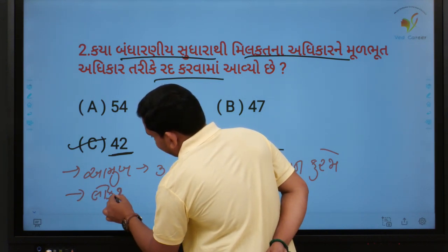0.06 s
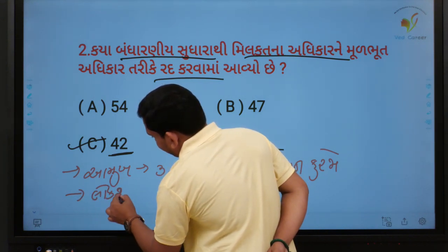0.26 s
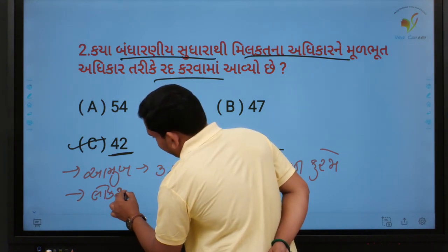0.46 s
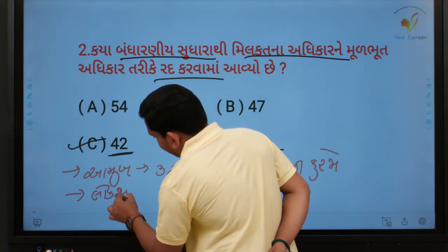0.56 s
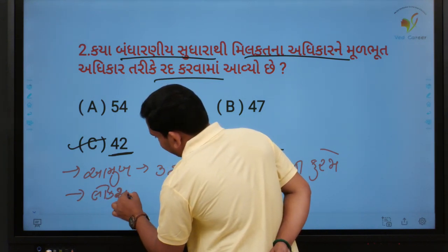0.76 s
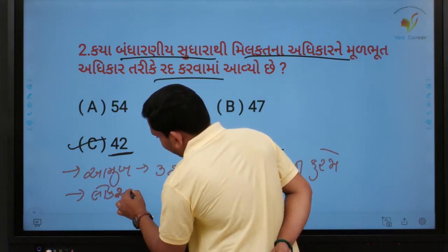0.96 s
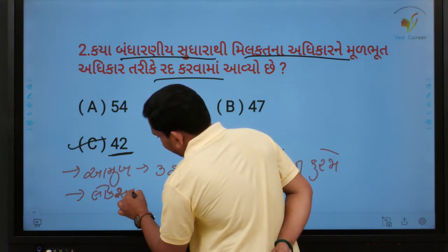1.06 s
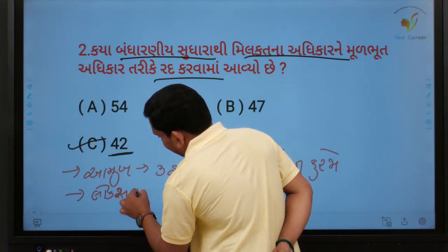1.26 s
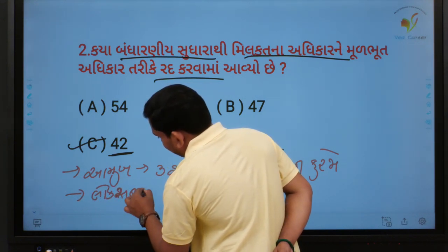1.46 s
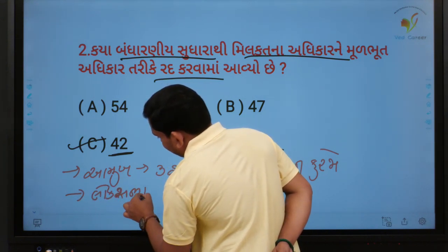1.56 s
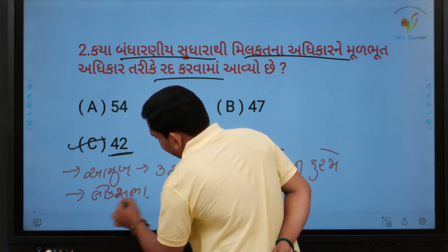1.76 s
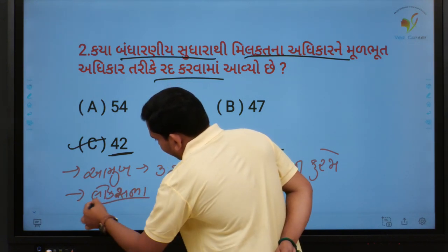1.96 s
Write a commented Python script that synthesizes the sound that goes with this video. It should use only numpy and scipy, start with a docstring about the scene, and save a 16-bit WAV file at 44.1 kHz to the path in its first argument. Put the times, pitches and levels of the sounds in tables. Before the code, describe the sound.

Short, uneven knocks of a plastic pen writing on a large glass screen.

```python
"""Classroom: a plastic stylus writes on a large glass display.
Each touch knocks the panel, which rings briefly and booms. Between knocks the tip slides with a fine
friction hiss, judders in stick-slip and ticks as it lifts. The room answers every knock over a low
rumble, and a faint hum swells midway. A faint background hiss, like a sleeve rustling, dips early
and grows toward the end."""
import sys
import numpy as np
from scipy import signal
from scipy.fft import rfft, irfft, next_fast_len
from scipy.io import wavfile
from scipy.ndimage import uniform_filter1d

SR = 44100
rng = np.random.default_rng(int(sys.argv[2]) if len(sys.argv) > 2 else 0)


def put_to_file(sound):
    """Save the sound as 16-bit audio at rate SR, in the file named by the first command-line argument."""
    columns = np.atleast_2d(sound).T  # one column per channel
    safe = np.clip(columns, -1, 1)
    whole_steps = np.round(safe * 32767)
    wavfile.write(sys.argv[1], SR, whole_steps.astype(np.int16))


N = 88861


def knock(pitch_hz, upper_db, hard_hz, click_db):
    """One touch: the tip snaps and pushes the glass, the panel rings, its small modes rattle."""
    # higher glass modes: freq_hz, level_db, t60_s
    glass_modes = [(1134, -12.5, 0.019), (1352, -15.5, 0.039), (1518, -14.5, .04), (1809, -21, 0.025),
                   (1890, -20, 0.017), (2156, -23, 0.012), (2900, -29, 0.022), (3790, -29, 0.031),
                   (4570, -38, 0.028), (5000, -28.5, 0.035), (8800, -29.5, 0.044)]
    # spectrum of the dense small modes: freq_hz, level_db
    rattle_spectrum = [(150, -49), (400, 12.5), (1000, 1.5), (1800, 0.5), (2700, -15.5), (3800, -6),
                       (5200, -6), (6600, -22.5), (8500, -15), (16000, -19)]
    push_s, hold_s, snap_s = 0.00011, 0.0082, 0.00036
    panel_t60_s, rattle_t60_s, click_t60_s = 0.082, 0.046, 0.035
    radiate_hz = 454  # the panel radiates little below this
    t = np.arange(SR // 6) / SR
    push = amp(-2.5) * t / push_s * np.exp(1 - t / push_s)
    # strong for a few cycles, until the wave has spread to the frame
    hold = np.exp(-(t / hold_s) ** 6) + amp(-22)
    panel = hold * ring([(pitch_hz, -2, panel_t60_s), (829, upper_db - 2, panel_t60_s)], t)
    # mode levels vary with the place of the touch
    modes = [(hz, db - 2 * rng.standard_normal(), t60_s) for hz, db, t60_s in glass_modes]
    rattle = noise(rattle_spectrum, len(t)) * amp(-9.5 - 60 * t / rattle_t60_s)
    body = panel + one_pole(push + ring(modes, t) + rattle, hard_hz)
    body = signal.lfilter(*signal.butter(2, radiate_hz, "high", fs=SR), body)
    snap = amp(-2) * np.exp(-t / snap_s) + amp(-14 - 60 * t / click_t60_s)
    click = rng.standard_normal(len(t)) * amp(click_db) * snap
    click = one_pole(one_pole(click, 2860, "high"), 13000)
    thud = ring([(231.5, -17.5, 0.058)], t)
    return -(body + click + thud)


def taps():
    """Each knock sounds through the room and sets off a low boom."""
    # tip touches: start_s, level_db, pitch_hz, upper_mode_rel_db, hardness_hz, click_rel_db, boom_rel_db
    touches = [(-0.15, -13, 699, -18, 1890, -26, -57), (0.378, -19, 702, -14.5, 2700, -14.5, -28),
               (0.5055, -23, 692, -9, 2120, -31, -42), (0.757, -15, 700, -12.5, 2700, -22, -28.5),
               (0.9908, -23, 693, -6.5, 1780, -50, -27.5), (1.5034, -11.5, 664, -12, 4540, -16.5, -29.5),
               (1.7330, -13.5, 665, -8.5, 1340, -44, -30.5)]
    # cabinet and room modes: freq_hz, level_db, t60_s
    boom_modes = [(41, -2, 3), (110.3, -0.5, 1.93), (126.2, 8, 0.42), (144.6, -10.5, 1.2), (163, -6.5, 1.7),
                  (262.3, -4.5, 0.66)]
    out, t = np.zeros(N), np.arange(SR) / SR
    boom = ring(boom_modes, t) * (1 - np.exp(-t / 0.0069))
    for start_s, level_db, pitch_hz, upper_db, hard_hz, click_db, boom_db in touches:
        add(out, start_s, amp(level_db) * room(knock(pitch_hz, upper_db, hard_hz, click_db)))
        add(out, start_s, amp(level_db + boom_db) * boom)
    return out


def slides():
    """Grainy friction follows stroke speed: hiss, whistle and fizz at the tip, dull rub in the panel."""
    # tip strokes: start_s, length_s, hiss_db, rub_db, whistle_db, fizz_db
    strokes = [(-0.02, 0.16, -66, -59, -81, -73), (0.127, 0.14, -66, -59.5, -78, -72),
               (0.392, 0.057, -67, -55, -82, -71), (0.529, 0.083, -66, -56.5, -82, -80),
               (0.782, 0.094, -65.5, -53, -86, -76), (1.022, 0.085, -68, -57, -71.5, -70),
               (1.113, 0.064, -68, -55, -80, -84), (1.196, 0.11, -61.5, -59.5, -73, -70),
               (1.302, 0.068, -59.5, -57.5, -75, -74), (1.517, 0.067, -61.5, -50.5, -71, -71),
               (1.755, 0.092, -64, -59, -69, -57), (1.774, 0.16, -56.5, -55.5, -60, -65),
               (1.868, 0.11, -61, -52, -61, -73)]
    # tip hiss spectrum: freq_hz, level_db
    hiss_spectrum = [(1500, -32), (2600, 11), (3400, -11), (4400, 12.5), (5500, -5), (7600, -18),
                     (8800, -8.5), (9500, 3), (10300, 2), (11100, 0), (12400, 3.5), (13600, -5),
                     (14600, -17), (16000, -13.5)]
    # panel rub spectrum: freq_hz, level_db
    rub_spectrum = [(200, -66), (500, -39), (650, 2), (900, 3), (1150, -1), (1500, -5), (2000, -20.5),
                    (3000, -16), (5000, -23), (7000, -22)]
    grain_db, grain_s, top_hz = 2.1, 0.00171, 15700
    out, t = np.zeros(N), np.arange(N) / SR
    hiss, rub = noise(hiss_spectrum), noise(rub_spectrum)
    whistle, fizz = band(N, hz=8720, width_hz=680), band(N, hz=14700, width_hz=1200)
    for start_s, length_s, hiss_db, rub_db, whistle_db, fizz_db in strokes:
        progress = np.clip((t - start_s) / length_s, 0, 1)
        speed = (4 * progress * (1 - progress)) ** 0.78
        # hiss bounces between hand and glass; the path shortens, so the colour glides up
        delay_s = 0.00059 - 0.0004 * progress * length_s
        bounce = sum(0.55 ** k * np.interp(t - k * delay_s, t, hiss) for k in (1, 2))
        tip = amp(hiss_db) * (hiss + bounce) + amp(whistle_db) * whistle + amp(fizz_db) * fizz
        out += speed * (tip + amp(rub_db) * rub)
    grain = unit(uniform_filter1d(rng.standard_normal(N), round(grain_s * SR)))
    out *= amp(grain_db * grain)
    return signal.sosfilt(signal.butter(12, top_hz, fs=SR, output="sos"), out)


def judders():
    """The tip sticks and slips on the glass: short, soft, fuzzy tones."""
    # stick-slip bursts: start_s, length_s, pitch_hz, level_db
    bursts = [(0.06, 0.042, 1195, -55), (1.222, 0.022, 650, -59), (1.304, 0.016, 645, -49),
              (1.341, 0.02, 1230, -56.5), (1.894, 0.054, 1160, -45.5)]
    out = np.zeros(N)
    for start_s, length_s, pitch_hz, level_db in bursts:
        size = round(length_s * SR)
        groan = band(SR // 4, pitch_hz, width_hz=220)[-size:]
        add(out, start_s, amp(level_db) * groan * np.hanning(size) ** 0.5)
    return out


def lifts():
    """The tip gives a tiny high tick as it leaves the glass."""
    # lift-offs: start_s, level_db
    lift_offs = [(0.266, -71), (0.603, -67), (0.886, -64), (1.61, -68)]
    rise_s = 0.0012
    out, t = np.zeros(N), np.arange(SR // 20) / SR
    envelope = t / rise_s * np.exp(1 - t / rise_s)
    for start_s, level_db in lift_offs:
        add(out, start_s, amp(level_db) * band(len(t), hz=5750, width_hz=900) * envelope)
    return out


def room(x):
    """Direct sound, two dull near echoes, quick scatter and a tail that dies faster in the treble."""
    # reverberant tail: freq_hz, level_db, t60_s
    tail_bands = [(162, 1.5, 1), (432, -1.5, 0.58), (640, -9.5, 0.43), (880, -1, 0.57), (1300, -3, 0.41),
                  (2700, -7, 0.48), (5100, -11.5, 0.42), (9100, -13.5, 0.23), (15800, -9, 0.11)]
    # echoes off near surfaces: delay_s, gain
    echoes = [(0.0159, 0.14), (.028, 0.16)]
    build_s, scatter_rise_s, scatter_t60_s = 0.014, 0.00082, 0.064
    t = np.arange(SR) / SR
    hz, frame_s, spectra = signal.stft(rng.standard_normal(SR), SR, nperseg=256)
    t60_s = lookup(tail_bands, hz, column=2)[:, None]
    decay = amp(lookup(tail_bands, hz)[:, None] - 60 * frame_s / t60_s)
    decay *= np.sqrt(2 * np.log(1000) / (t60_s * SR))  # band energy independent of t60
    tail = signal.istft(spectra * decay, SR, nperseg=256)[1][:SR]
    tail *= 1 - np.exp(-(t / build_s) ** 2)
    scatter = one_pole(one_pole(rng.standard_normal(SR), 800, "high"), 3330)
    scatter *= amp(-60 * t / scatter_t60_s) * np.minimum(t / scatter_rise_s, 1)
    near = one_pole(sum(gain * np.sinc((t - delay_s) * SR) for delay_s, gain in echoes), 1950)
    response = near + amp(-11.5) * scatter / np.linalg.norm(scatter) + tail
    response[0] += 1  # direct sound
    return signal.fftconvolve(x, response)[:N]


def hum():
    """A faint low tone swells and fades, its pitch drifting."""
    # hum course: time_s, pitch_hz, level_db
    course = [(0.8, 159.7, -54.5), (0.95, 161, -47), (1.08, 168.8, -42), (1.22, 169.2, -46.5),
              (1.359, 166.1, -56)]
    time_s, pitch_hz, level_db = np.transpose(course)
    t = np.arange(N) / SR
    phase = 2 * np.pi * np.cumsum(np.interp(t, time_s, pitch_hz)) / SR
    return amp(np.interp(t, time_s, level_db, left=-100, right=-100)) * np.sin(phase)


def background():
    """Steady rumble and a faint hiss, like a sleeve rustling, that dips early and grows toward the end."""
    # background spectrum: freq_hz, level_db
    floor_spectrum = [(15, -12), (28, 0), (39, 3.5), (52, -2.5), (66, -3), (85, -10.5), (120, 0),
                      (165, -0.5), (210, -9), (300, -13.5), (450, -23), (700, -21), (1300, -28),
                      (2500, -38), (5000, -45), (9000, -49.5), (15500, -51), (16500, -60)]
    # course of the rustling hiss: time_s, gain_db
    rustle_course = [(0, 1), (0.33, -7), (0.7, -4), (1.0, -0.5), (1.42, 2), (1.7, 3), (2.0, 6)]
    floor = amp(-47.5) * noise(floor_spectrum)
    rumble = one_pole(floor, 210)
    rustle_gain = amp(np.interp(np.arange(N) / SR, *np.transpose(rustle_course)))
    return rumble + (floor - rumble) * rustle_gain


def amp(db):
    """Decibels to gain."""
    return 10 ** (np.asarray(db) / 20)


def unit(x):
    """Scale to rms 1."""
    return x / np.sqrt(np.mean(x ** 2) + 1e-20)


def lookup(table, hz, column=1):
    """Interpolate a table column over log frequency."""
    rows = np.array(table, float)
    return np.interp(np.log(hz + 1), np.log(rows[:, 0] + 1), rows[:, column])


def add(mix, start_s, sound):
    """Mix a sound in at start_s, which may be negative."""
    at = round(start_s * SR)
    sound = sound[max(-at, 0):]
    part = mix[max(at, 0):][:len(sound)]
    part += sound[:len(part)]


def noise(spectrum, size=N):
    """Noise shaped by rows of freq_hz, level_db; rms 1."""
    n = next_fast_len(size)
    gain = amp(lookup(spectrum, np.fft.rfftfreq(n, 1 / SR)))
    return unit(irfft(rfft(rng.standard_normal(n)) * gain, n)[:size])


def band(size, hz, width_hz):
    """Noise in one resonance, rms 1."""
    edges_hz = [hz - width_hz / 2, hz + width_hz / 2]
    return unit(signal.lfilter(*signal.butter(2, edges_hz, "band", fs=SR), rng.standard_normal(size)))


def ring(modes, t):
    """Sum of decaying sines from rows of freq_hz, level_db, t60_s."""
    return sum(amp(db - 60 * t / t60_s) * np.sin(2 * np.pi * hz * t) for hz, db, t60_s in modes)


def one_pole(x, hz, kind="low"):
    """First-order low-pass or high-pass."""
    return signal.lfilter(*signal.butter(1, hz, kind, fs=SR), x)


def scene():
    """The writing in its room, mono."""
    return (taps() + room(slides() + judders() + lifts()) + hum() + background())[None]


def record(dry):
    """Band limit at 16.6 kHz."""
    lowpass = signal.firwin(511, 16600, window=("kaiser", 9), fs=SR)
    return signal.oaconvolve(dry, lowpass[None], "same")


dry = scene()
out = record(dry)
put_to_file(out)
```